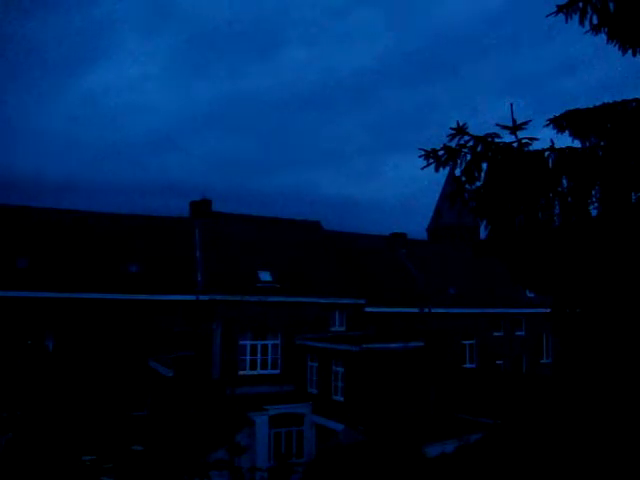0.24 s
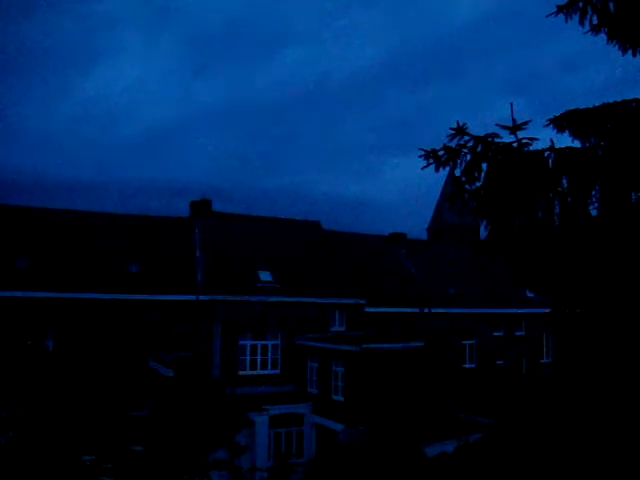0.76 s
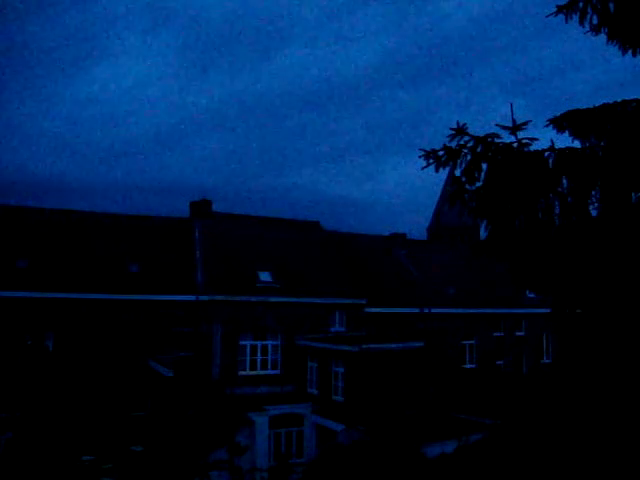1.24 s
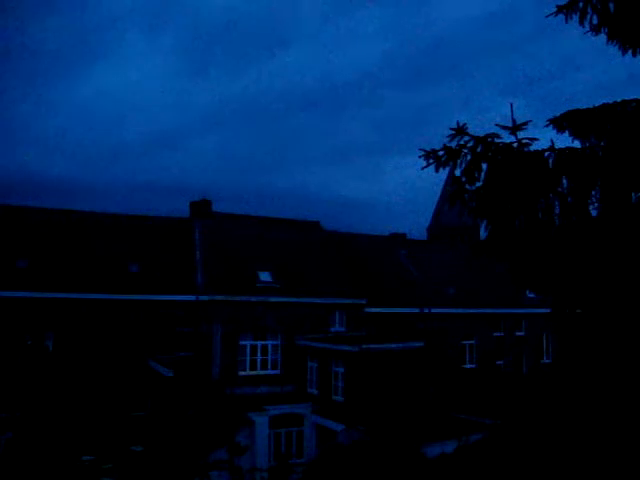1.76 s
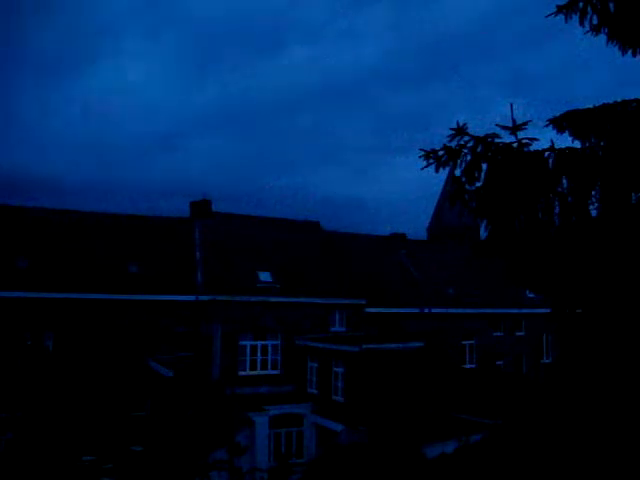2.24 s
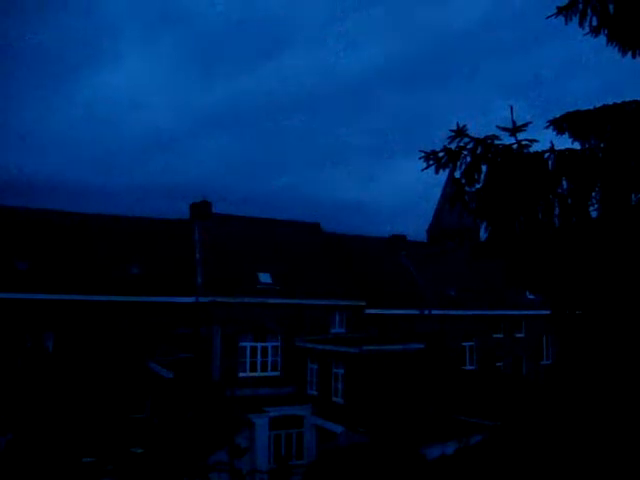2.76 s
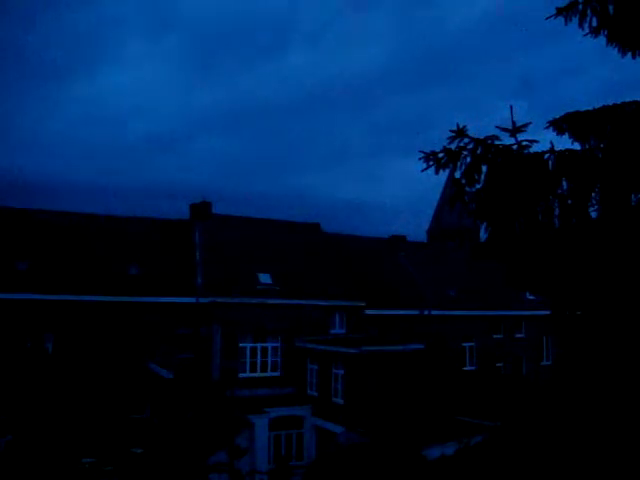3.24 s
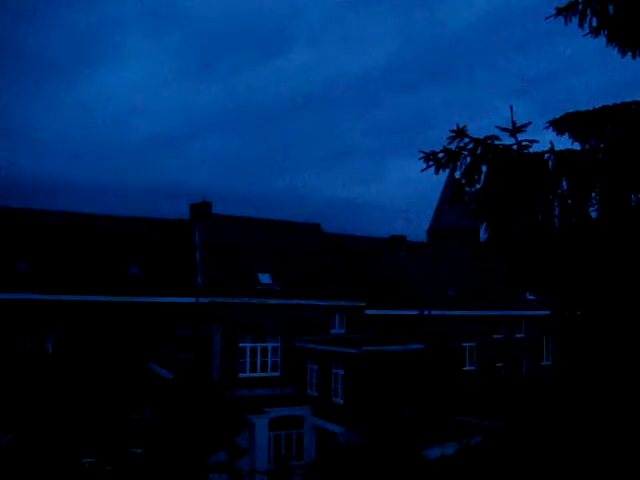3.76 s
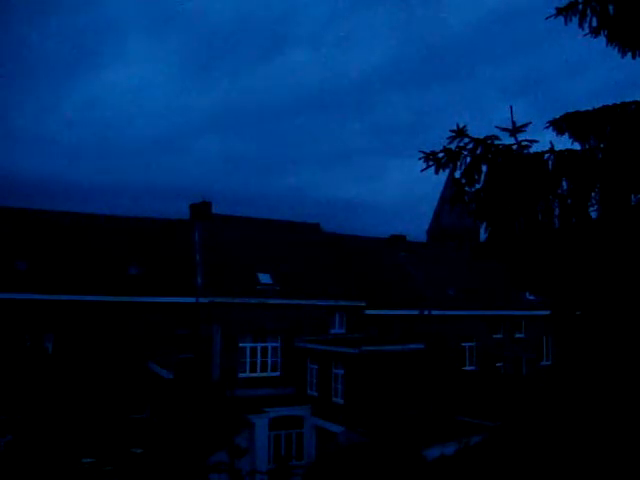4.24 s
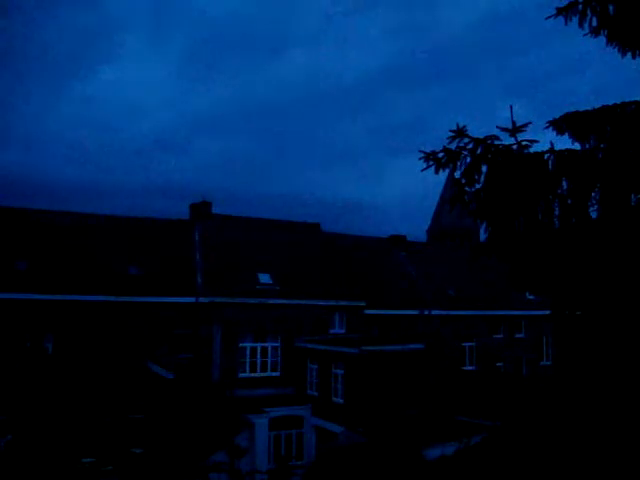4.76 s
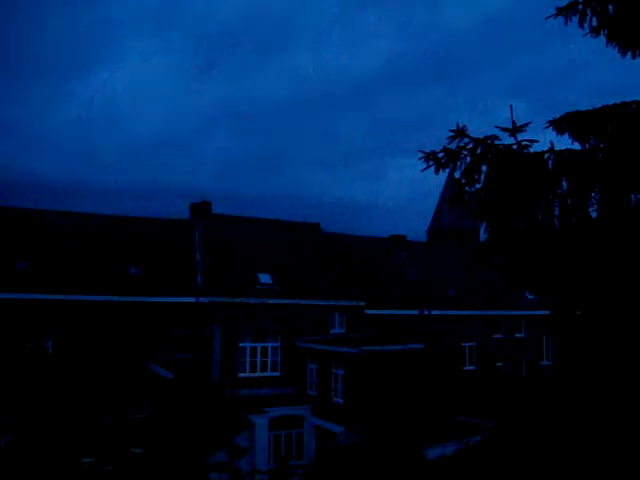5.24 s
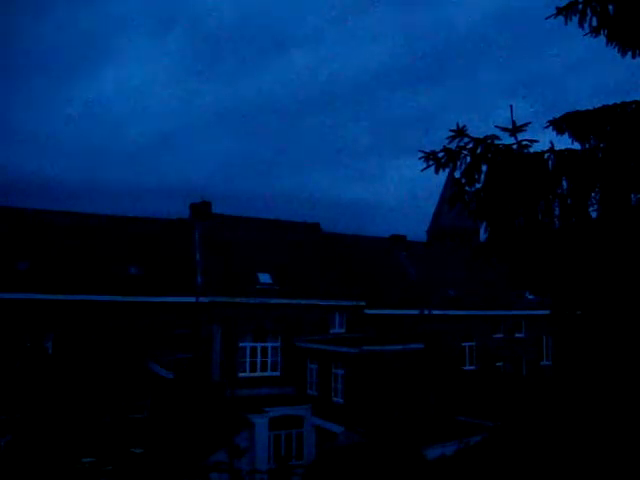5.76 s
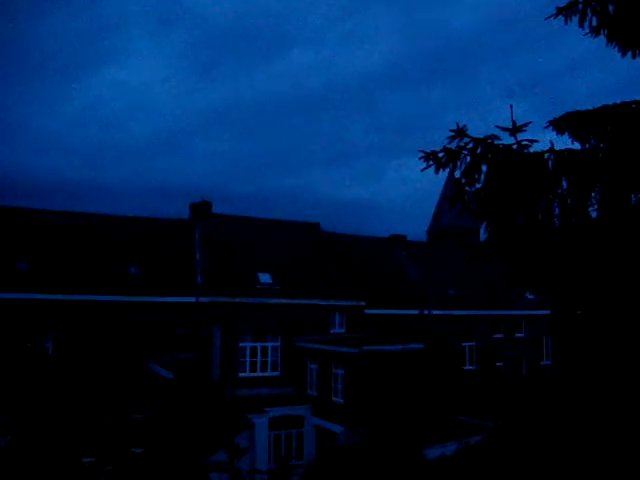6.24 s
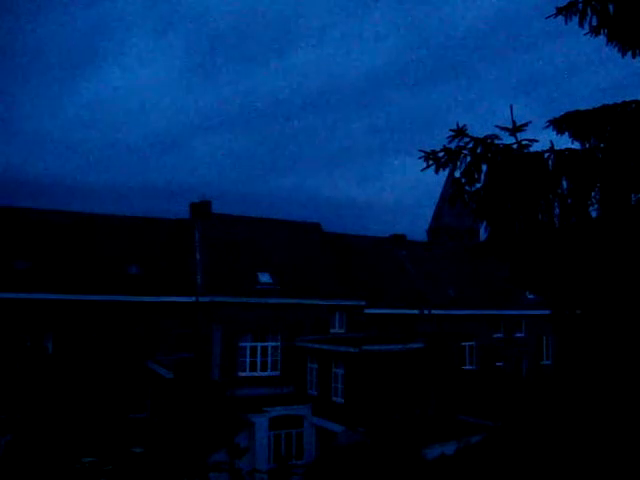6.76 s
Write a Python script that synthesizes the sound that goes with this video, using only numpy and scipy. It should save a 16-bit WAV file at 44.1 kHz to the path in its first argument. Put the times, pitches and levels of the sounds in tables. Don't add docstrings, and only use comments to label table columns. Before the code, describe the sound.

A thrush whistles from a far roof while a nearer bird trills and warbles; distant birds answer in echo over faint hum, then a dry knock.

```python
import sys
import numpy as np
from scipy import signal
from scipy.fft import rfft, irfft
from scipy.io import wavfile
from scipy.ndimage import uniform_filter1d, minimum_filter1d

SR = 44100
rng = np.random.default_rng(int(sys.argv[2]) if len(sys.argv) > 2 else 0)


def persist_wave(psi):
    counts = np.round(np.clip(psi, -1, 1) * 32767).astype(np.int16)
    wavfile.write(sys.argv[1], SR, np.atleast_2d(counts).T)


def voltage_ratio(decibels):
    exponent = np.asarray(decibels, float) / 20
    return 10 ** exponent


N = 309141

# start_s, length_s, first_hz, last_hz, level_db
THRUSH_HELD = [
    (0.004, .07, 2063, 2422, -37.5),
    (1.353, 0.12, 2186, 2242, -36),
    (4.417, .14, 2308, 2304, -50),
]
# start_s, length_s, first_hz, last_hz, level_db
THRUSH_SCOOPS = [
    (1.094, .13, 1209, 1603, -44),
    (4.185, 0.093, 1380, 1880, -48.5),
]
# start_s, length_s, first_hz, last_hz, level_db
THRUSH_FADING = [(0.0, 0.013, 2120, 2080, -30.5), (1.223, 0.067, 1715, 2107, -38.5),
                 (1.285, 0.064, 2120, 2040, -47), (4.268, 0.072, 1860, 2035, -43.5),
                 (4.566, .10, 2086, 2127, -44.5), (1.554, 0.14, 1850, 1754, -38.5),
                 (1.69, .095, 1774, 1690, -42), (1.779, 0.056, 1676, 1624, -42.5)]

# start_s, length_s, first_hz, last_hz, level_db
MIDDLE_NOTES = [(0, .037, 5290, 5020, -64.5), (0, 0.04, 3100, 2770, -52), (1.075, 0.062, 2170, 2580, -58.5),
                (1.25, 0.032, 2680, 2780, -64), (1.285, 0.027, 2770, 2640, -63),
                (3.8, .05, 3180, 2460, -72), (4.13, .07, 1850, 1880, -65), (4.21, .04, 2500, 2460, -61.5),
                (4.25, .108, 2455, 2700, -62.5), (5.055, .015, 9010, 9150, -68.7),
                (5.105, .015, 9200, 9200, -68.4), (5.265, 0.044, 2900, 3080, -65),
                (6.225, 0.032, 2270, 2650, -63), (6.295, 0.058, 2810, 2850, -60),
                (6.315, .023, 4060, 4100, -65), (6.345, .036, 2350, 1670, -53),
                (6.378, 0.018, 1670, 1648, -52.5), (6.365, 0.087, 2820, 2190, -58),
                (6.455, 0.059, 2180, 2100, -61.5), (6.785, 0.043, 2160, 2010, -63.5),
                (6.83, 0.057, 2000, 2080, -63), (6.965, 0.028, 2630, 2700, -60),
                (6.99, 0.02, 2600, 3130, -58)]
# start_s, level_db
MIDDLE_CHIPS = [(5.818, -61), (5.852, -68), (5.888, -64), (5.96, -66)]

# start_s, length_s, first_hz, last_hz, level_db
FAR_WHISTLES = [(4.995, 0.036, 5950, 6650, -57.5), (5.0, .036, 4150, 4560, -50),
                (5.05, .03, 4750, 5200, -55), (5.10, .04, 6300, 6700, -71), (5.09, .04, 4900, 5460, -63),
                (5.1, .028, 4360, 4500, -68), (5.135, .07, 5000, 5350, -65), (5.305, .09, 4210, 4100, -59),
                (5.31, .052, 6800, 6450, -66), (5.34, .074, 2384, 2150, -66),
                (5.395, .064, 4130, 4130, -52.5), (5.46, 0.11, 4150, 4116, -57),
                (5.49, .054, 2355, 2093, -64)]
# start_s, level_db
FAR_FLICKS = [(5.438, -52), (5.533, -57.5), (5.634, -59)]
# start_s, length_s, centre_hz, level_db
FAR_BUZZES = [(.0, 0.054, 1665, -53.5), (4.601, .17, 2680, -63.5), (4.774, .10, 3300, -53.5),
              (4.862, .10, 2380, -52.5), (4.899, 0.081, 2910, -61), (5.061, .11, 4920, -61),
              (5.136, .14, 5200, -64.5), (5.401, 0.067, 4300, -56.5), (5.48, 0.083, 3590, -60.5),
              (5.508, .05, 4170, -62), (5.618, .079, 2634, -63), (5.62, 0.094, 3800, -71)]
# time_s, level_db
CHATTER_LEVEL = [(0, -65), (1, -72), (2, -70), (3, -70.5), (3.5, -79), (4, -73.5), (5, -67), (6, -94),
                 (7.01, -86)]

# pitch_hz, level_db (per Hz)
HUM_AND_HISS = [(15, -56), (25, -35.5), (49, -21), (85, -19.5), (121, -13), (195, -8), (238, -4.5),
                (321, -2.5), (392, -4.5), (467, -7.5), (852, -10.5), (1950, -19.5), (2320, -16),
                (2500, -19.5), (9900, -24.5), (12900, -56), (21800, -120)]
# start_s, peak_db, tilt_db_per_octave
BLOWS = [
    (.0775, -45, 1),
    (.094, -42, 10),
    (0.126, -35.5, 3.5),
    (6.2760, -9, 1.5),
    (6.2767, -19, 23),
    (6.826, -49, -2.5),
]
# pitch_hz, level_db, t60_s
SUPPORT_MODES = [(670, -5.5, 0.019), (940, -7.5, 0.028), (1318, -9, 0.03), (1650, -11, 0.059),
                 (1737, -6.5, 0.028), (2210, -1.5, 0.011), (2900, -6.5, 0.013), (3500, -8.5, 0.0087),
                 (5000, -7.5, 0.014), (6660, -19.5, 0.011), (7200, -24.5, 0.0037), (7700, -25.5, 0.0096),
                 (9200, -25.5, 0.0023)]

# start_s, length_s, first_hz, last_hz, level_db
NEAR_WHISTLES = [(.195, 0.098, 3200, 3340, -62), (.272, 0.017, 4250, 6640, -58),
                 (.274, 0.011, 4430, 3800, -53), (.284, 0.017, 3800, 5170, -53.5),
                 (.298, 0.0073, 5230, 3500, -55), (.302, .016, 3306, 3124, -39.5),
                 (.312, 0.0092, 3070, 2270, -47), (.655, .06, 4280, 3650, -63),
                 (1.886, .0056, 2150, 3250, -49), (1.898, 0.014, 3400, 7870, -57),
                 (2.352, 0.022, 8740, 8180, -64), (2.37, 0.036, 8200, 8550, -63),
                 (2.39, 0.025, 7500, 7800, -61), (2.418, 0.041, 7900, 7150, -62),
                 (2.48, .033, 9150, 7700, -65.5), (2.515, .02, 8900, 7290, -64),
                 (2.605, .072, 7550, 8080, -59), (2.625, .04, 6700, 6940, -63),
                 (2.7, .038, 6520, 7700, -64)]
# lowest_point_s, fall_db, hook_db, climb_db, inner_db
TRILL_SYLLABLES = [(.322, -46, -50.5, -54.5, -75), (.387, -46, -50, -54, -53),
                   (0.449, -46, -46.5, -55.5, -54.5), (0.515, -45, -48.5, -55, -55),
                   (.579, -49, -59, -59, -57), (0.646, -48.5, -78, -78, -59)]
# from_lowest_point_s, pitch_hz, level_db
FALL_STROKE = [(-.024, 9800, -9), (-.019, 6500, -6), (-.015, 4600, -7), (-.008, 3250, -2), (-.004, 2500, 1),
               (0, 2300, 1)]
HOOK_STROKE = [(0, 2300, -1.5), (.004, 2700, 0), (.008, 3400, -3)]
CLIMB_STROKE = [(.008, 4180, -3), (.012, 6000, 4), (.016, 6200, -1.5), (.022, 5900, 1), (.028, 6900, -1.5),
                (.033, 9800, -1)]
INNER_STROKE = [(-.052, 5900, -2), (-.046, 4700, -2), (-.040, 4000, 0), (-.025, 5400, 0), (-.017, 3300, -4)]
# start_s, length_s, swings_per_s, level_db
WARBLE_RUNS = [
    (1.912, .097, 60.0, -44.5),
    (2.732, .108, 51.8, -48.5),
]
# share_of_length, low_hz, high_hz, level_db
WARBLE_LIMITS = [(0, 5307, 7700, -10), (.32, 3550, 6147, -.5), (.63, 3007, 4460, -.5), (.8, 2970, 3200, -2),
                 (1, 2433, 2440, -10.5)]
# start_s, low_voice_db, high_voice_db
TWITTER_PULSES = [(2.07, -60, -67), (2.108, -52, -54), (2.147, -52, -56), (2.181, -52, -54),
                  (2.217, -53, -57), (2.254, -55, -57)]
# time_s, pitch_hz, level_db
LONG_SLIDE = [(2.358, 6280, -57), (2.373, 4660, -58.5), (2.392, 3850, -49.5), (2.414, 3400, -61),
              (2.428, 3240, -44), (2.448, 2940, -52.5)]
# centre_hz, width_hz, lift_db
THROAT_RESONANCE = (3120, 540, 5.2)

# delay_s, level_db
EAVES_ECHOES = [(.0023, -14.5), (.0041, -8), (.0074, -11), (.0118, -7.5), (.019, -15.5), (.031, -14)]
# pitch_hz, t60_s
STREET_DECAY = [(1000, 2.12), (2500, 1.02), (5000, 1.15), (9000, 2.2)]
# pitch_hz, depth_db
DROP_DEPTH = [(700, 40), (1200, 17), (2500, 29), (4000, 19.5), (9000, 9.5)]


def rms_one(x):
    return x / np.sqrt(np.mean(x ** 2) + 1e-20)


def at_hz(points, hz):
    table_hz, values = np.array(points)[:, 0], np.array(points)[:, 1]
    return np.interp(np.log(hz), np.log(table_hz), values)


def drift(rate_hz, count):
    r = np.exp(-2 * np.pi * rate_hz / SR)
    noise = rng.standard_normal(count + 8000)
    return rms_one(signal.lfilter([1], [1, -2 * r, r * r], noise)[8000:])


def add(out, start_s, sound):
    i = max(round(start_s * SR), 0)
    out[i:i + len(sound)] += sound[:max(N - i, 0)]


def syrinx(hz, db, edge_s, overtone_db):
    t = np.arange(len(hz)) / SR
    phase = 2 * np.pi * np.cumsum(hz) / SR
    overtones = np.sin(2 * phase) + 1.7 * np.sin(3 * phase)
    tone = np.sin(phase) + voltage_ratio(overtone_db) * overtones * (hz < 3300)
    edges = np.clip(np.minimum(t, t[::-1]) / edge_s, 0, 1)
    return np.sqrt(2) * voltage_ratio(db) * tone * np.sin(edges * np.pi / 2) ** 2


def shape(row, bend, peak, rise_db, fade_db):
    start_s, length_s, first_hz, last_hz, db = row
    u = np.linspace(0, 1, max(int(length_s * SR), 8))
    level_db = db + np.interp(u, [0, np.clip(peak, .02, .98), 1], [-rise_db, 0, -fade_db])
    return start_s, last_hz + (first_hz - last_hz) * (1 - u) ** bend, level_db


def glide(rows, smooth_s):
    s, *columns = np.transpose(rows)
    t = np.arange(s[0], s[-1], 1 / SR)
    width = max(int(smooth_s * SR), 1)
    return s[0], [uniform_filter1d(np.interp(t, s, c), width, mode="nearest") for c in columns]


def whistles(table, bend, flutter_db, waver_hz):
    out = np.zeros(N)
    for row in table:
        start_s, hz, db = shape(row, bend, peak=0.45, rise_db=1.5, fade_db=0.5)
        hz = hz + waver_hz * drift(80, len(hz))
        db = db + flutter_db * drift(54, len(hz))
        add(out, start_s, syrinx(hz, db, edge_s=0.00073, overtone_db=-35.5))
    return out


def roof_thrush():
    out = np.zeros(N)
    sung = [shape(row, bend=1.12, peak=0.3, rise_db=11.5, fade_db=3.0) for row in THRUSH_HELD]
    sung += [shape(row, bend=1.05, peak=1.0, rise_db=15, fade_db=4.5) for row in THRUSH_SCOOPS]
    sung += [shape(row, bend=1.25, peak=0.23, rise_db=12.5, fade_db=9.5) for row in THRUSH_FADING]
    for start_s, hz, db in sung:
        hz = hz + 12 * drift(60, len(hz))
        db = db + 1.6 * drift(65, len(hz))
        add(out, start_s, syrinx(hz, db, edge_s=0.0065, overtone_db=-38.5))
    return out


def middle_whistlers():
    chips = [(start_s, .023, 3800, 3180, db) for start_s, db in MIDDLE_CHIPS]
    clear = whistles(MIDDLE_NOTES, bend=1.4, flutter_db=-0.9, waver_hz=21)
    return clear + whistles(chips, bend=3.0, flutter_db=1.5, waver_hz=30)


def buzzes():
    out = np.zeros(N)
    shakes_per_s, swing_share = 50, 0.094
    for start_s, length_s, centre_hz, db in FAR_BUZZES:
        count = max(int(length_s * SR), 8)
        regular = np.sin(2 * np.pi * shakes_per_s * np.arange(count) / SR)
        shake = 0.35 * regular + 0.66 * drift(220, count)
        hz = centre_hz * (np.linspace(1.04, .96, count) + swing_share * (shake - shake.mean()))
        add(out, start_s, syrinx(hz, db + 3.9 * drift(40, count), edge_s=0.0097, overtone_db=-32))
    return out


def far_birds():
    flicks = [(start_s, .014, 4100, 2800, db) for start_s, db in FAR_FLICKS]
    far = whistles(FAR_WHISTLES, bend=2.53, flutter_db=0.5, waver_hz=60)
    return far + whistles(flicks, bend=1.25, flutter_db=3.0, waver_hz=60) + buzzes()


def chatter():
    out = np.zeros(N)
    for when, pitch, bend, length in rng.random((260, 4)):
        count = int((0.022 + 0.058 * length) * SR)
        hz = 2050 * 1.7 ** (pitch ** 2.2) * np.linspace(1, .85 + .3 * bend, count)
        add(out, when * N / SR, syrinx(hz, 0, edge_s=0.021, overtone_db=-33.5))
    s, db = np.transpose(CHATTER_LEVEL)
    return out * voltage_ratio(np.interp(np.arange(N) / SR, s, db))


def hum_and_hiss():
    hz = np.clip(np.arange(N // 2 + 1) * SR / N, 1, 9500)
    spectrum = rfft(rng.standard_normal(N)) * voltage_ratio(at_hz(HUM_AND_HISS, hz))
    return voltage_ratio(-53.5) * rms_one(irfft(spectrum, N))


def ticks_and_knock():
    out = np.zeros(N)
    start_s, peak_db, tilt_db = np.transpose(BLOWS)
    at = [round(s * SR) for s in start_s]
    for k, (hz, level_db, t60_s) in enumerate(SUPPORT_MODES):
        clicks = np.full(N, 1e-18)
        clicks[at] = voltage_ratio(peak_db + level_db + tilt_db * np.log2(hz / 4500))
        r, w = voltage_ratio(-60 / (t60_s * SR)), 2 * np.pi * hz / SR
        ring = signal.lfilter([0, np.sin(w)], [1, -2 * r * np.cos(w), r * r], clicks)
        out += (-1) ** k * ring
    out[at] += voltage_ratio(peak_db - 10.0)
    return signal.sosfilt(signal.butter(2, 260, "high", fs=SR, output="sos"), out)


def throat_db(hz):
    centre_hz, width_hz, lift_db = THROAT_RESONANCE
    return lift_db / (1 + ((hz - centre_hz) / width_hz) ** 2)


def trill():
    out = np.zeros(N)
    strokes = (FALL_STROKE, HOOK_STROKE, CLIMB_STROKE, INNER_STROKE)
    for lowest_s, *levels in TRILL_SYLLABLES:
        for stroke, level_db in zip(strokes, levels):
            start_s, (hz, db) = glide(stroke, smooth_s=.003)
            hz = hz * rng.normal(1, 0.0141) + 60 * drift(150, len(hz))
            db = db + level_db + throat_db(hz) - 1.5 + 2.7 * drift(120, len(hz))
            add(out, lowest_s + start_s, syrinx(hz, db, edge_s=0.0011, overtone_db=-28))
    return out


def warble(start_s, length_s, swings_per_s, level_db):
    out = np.zeros(N)
    limits = [(start_s + share * length_s, *rest) for share, *rest in WARBLE_LIMITS]
    start_s, (low_hz, high_hz, db) = glide(limits, smooth_s=0.0045)
    swing = .5 + .5 * np.cos(2 * np.pi * swings_per_s * np.arange(len(low_hz)) / SR)
    hz = low_hz + (high_hz - low_hz) * swing
    db = db + level_db - 4.7 * np.log2(hz / low_hz)
    db = db + throat_db(hz) - 3.0 + 2.5 * drift(100, len(hz))
    add(out, start_s, syrinx(hz, db, edge_s=0.00087, overtone_db=-28.0))
    return out


def twitter():
    pulse_s, drop_hz, sag_hz_per_s = 0.0172, 279.2, 2000
    high_hz = 6480
    rows = []
    for start_s, low_db, high_db in TWITTER_PULSES:
        low_hz = 5650 - sag_hz_per_s * (start_s - TWITTER_PULSES[0][0])
        rows.append((start_s, pulse_s, low_hz, low_hz - drop_hz, low_db))
        rows.append((start_s, pulse_s, high_hz, high_hz - 0.67 * drop_hz, high_db))
    return whistles(rows, bend=1.3, flutter_db=-0.2, waver_hz=40)


def slide():
    out = np.zeros(N)
    start_s, (hz, db) = glide(LONG_SLIDE, smooth_s=.005)
    hz = hz + 30 * drift(80, len(hz))
    db = db + 1.5 * drift(60, len(hz))
    add(out, start_s, syrinx(hz, db, edge_s=.002, overtone_db=-38))
    return out


def near_bird():
    song = whistles(NEAR_WHISTLES, bend=1.4, flutter_db=0.1, waver_hz=30)
    return song + trill() + sum(warble(*row) for row in WARBLE_RUNS) + twitter() + slide()


def eaves(x, echo_db):
    out = x.copy()
    for k, (delay_s, db) in enumerate(EAVES_ECHOES):
        add(out, delay_s, (-1) ** k * voltage_ratio(db + echo_db) * x)
    return out


def street():
    t = np.arange(int(1.6 * SR)) / SR
    out = np.zeros(len(t))
    edges_hz = 700 * 2 ** np.arange(0, 4.1, .5)
    for low, high in zip(edges_hz, edges_hz[1:]):
        band_pass = signal.butter(2, [low, high], "band", fs=SR, output="sos")
        band = signal.sosfilt(band_pass, rng.standard_normal(len(t)))
        out += band * voltage_ratio(-60 * t / at_hz(STREET_DECAY, np.sqrt(low * high)))
    out = out * np.clip(t / 0.0061, 0, 1)
    return out / np.sqrt(np.sum(out ** 2))


def scene():
    roof, middle, far, near = roof_thrush(), middle_whistlers(), far_birds(), near_bird()
    direct = eaves(near + middle, echo_db=-4)
    direct += eaves(voltage_ratio(1.0) * roof, echo_db=-7.5)
    direct += eaves(voltage_ratio(-3) * far, echo_db=-1.0)
    send = voltage_ratio(-9.5) * near + voltage_ratio(-7) * roof + voltage_ratio(-8.0) * middle + voltage_ratio(-3.0) * far + chatter()
    echo = signal.fftconvolve(send, street())[:N]
    mono = direct + echo + ticks_and_knock() + hum_and_hiss()
    return np.array([mono, mono])


def drop_weak_bands(x):
    hz, _, cells = signal.stft(x, SR, nperseg=256)
    level_db = 10 * np.log10(uniform_filter1d(np.abs(cells) ** 2, size=3, axis=0) + 1e-20)
    loudest_db = -minimum_filter1d(minimum_filter1d(-level_db, size=11, axis=1), size=3, axis=0)
    depth_db = at_hz(DROP_DEPTH, np.maximum(hz, 1))[:, None]
    keep = np.clip((level_db - loudest_db + depth_db) / 4.6, 0, 1)
    smear_db = -minimum_filter1d(-level_db, size=3, axis=1) - 21
    grit = voltage_ratio(smear_db) * np.exp(2j * np.pi * rng.random(cells.shape))
    return signal.istft(cells * keep + grit, SR, nperseg=256)[1][:N]


def band_limit(x):
    return signal.sosfilt(signal.butter(12, 10270, fs=SR, output="sos"), x)


def record(dry):
    mono = signal.sosfilt(signal.butter(2, 25, "high", fs=SR, output="sos"), dry[0])
    mono = drop_weak_bands(mono)
    mono = signal.sosfilt(signal.ellip(12, .5, 60, 10210, fs=SR, output="sos"), mono)
    return band_limit(np.array([mono, mono]))


dry = scene()
out = record(dry)
persist_wave(out)
```